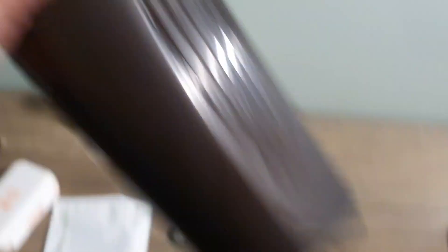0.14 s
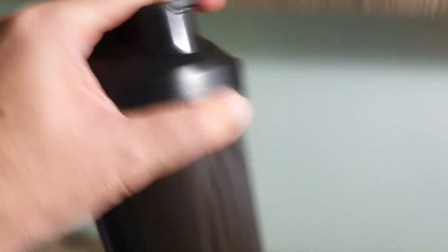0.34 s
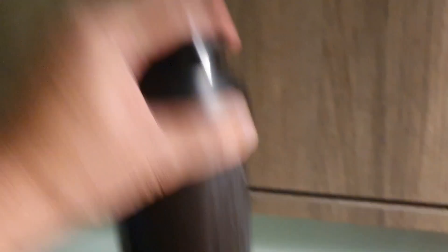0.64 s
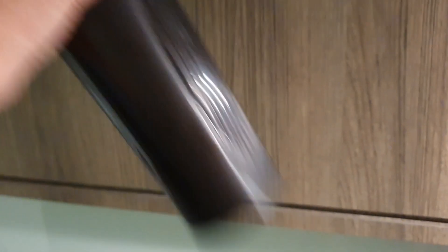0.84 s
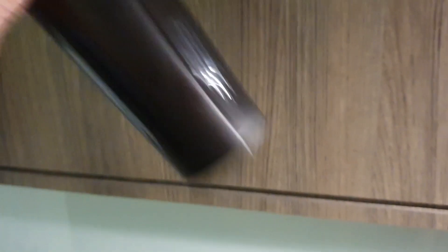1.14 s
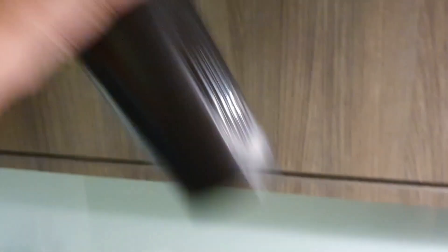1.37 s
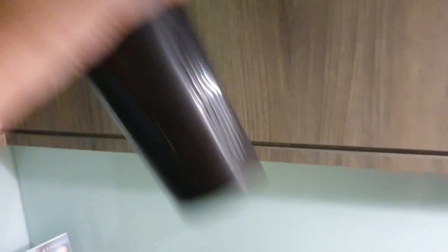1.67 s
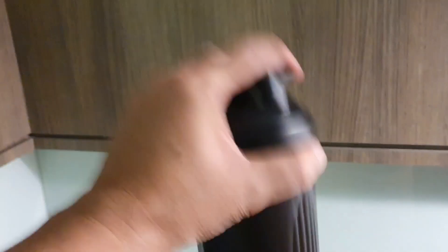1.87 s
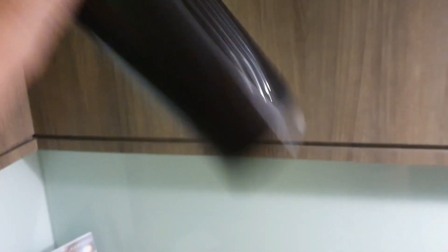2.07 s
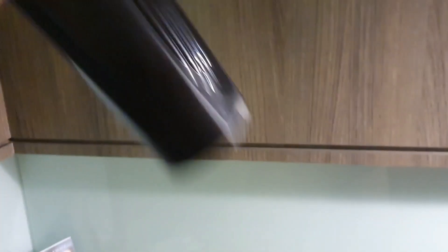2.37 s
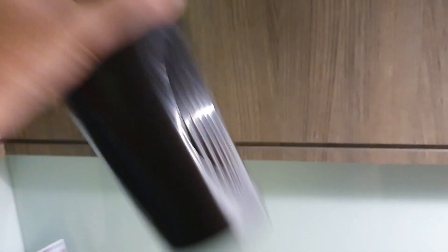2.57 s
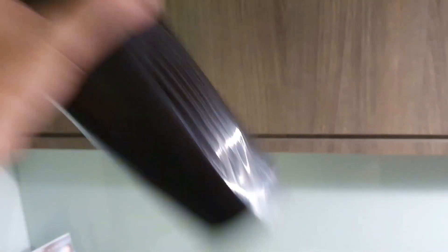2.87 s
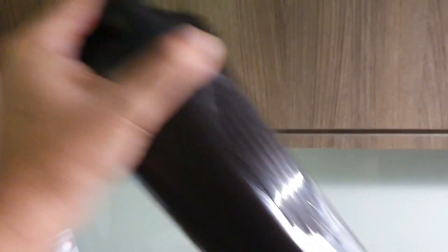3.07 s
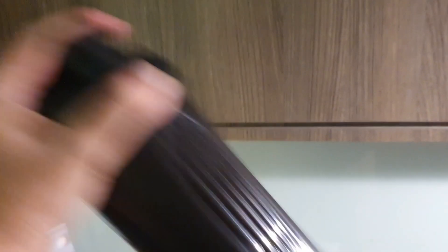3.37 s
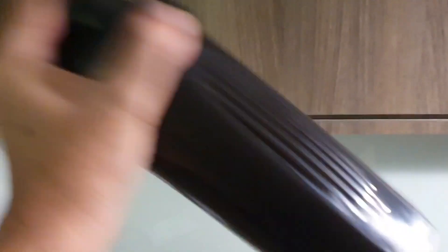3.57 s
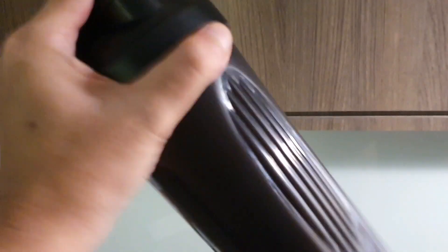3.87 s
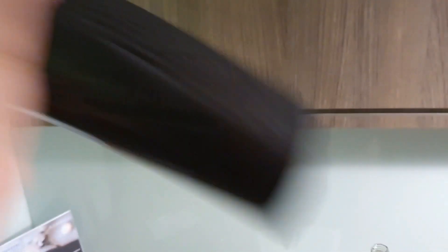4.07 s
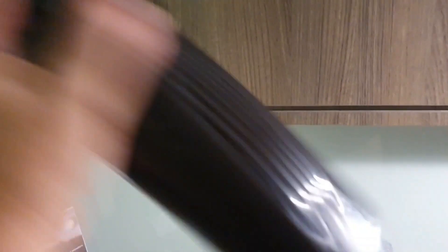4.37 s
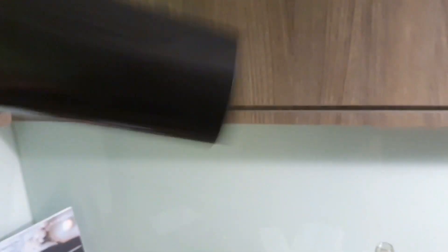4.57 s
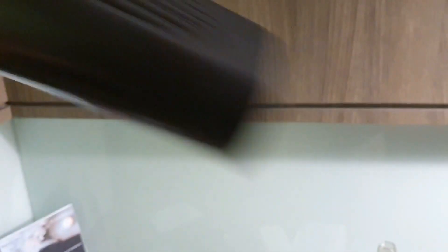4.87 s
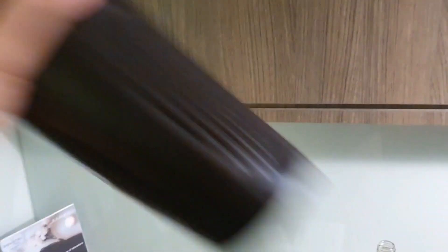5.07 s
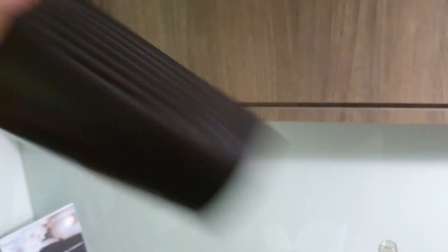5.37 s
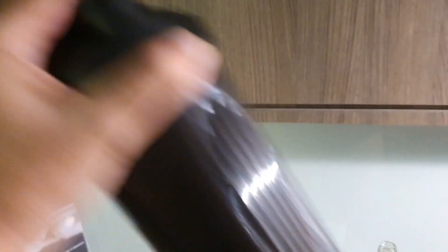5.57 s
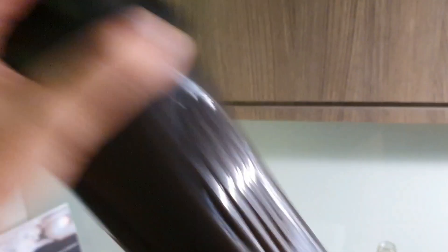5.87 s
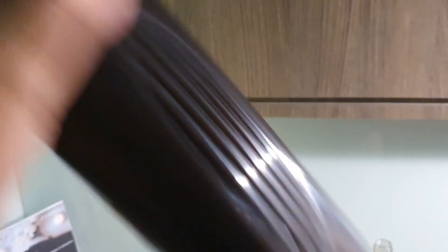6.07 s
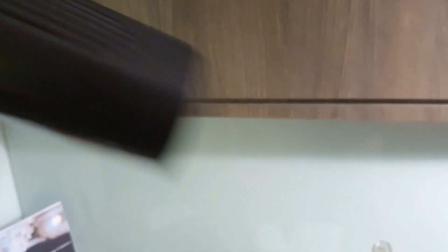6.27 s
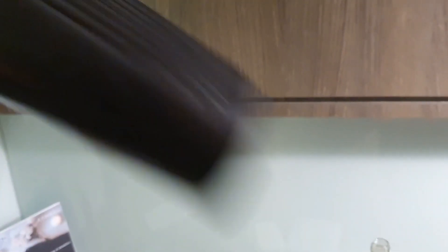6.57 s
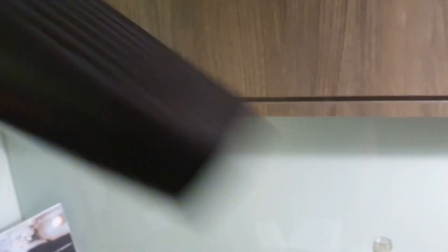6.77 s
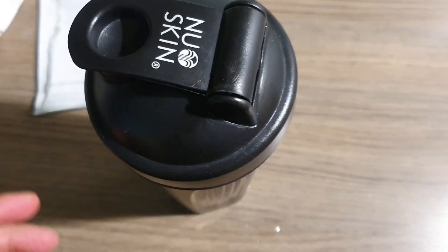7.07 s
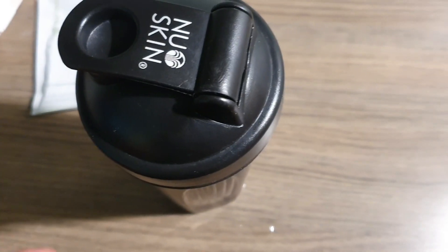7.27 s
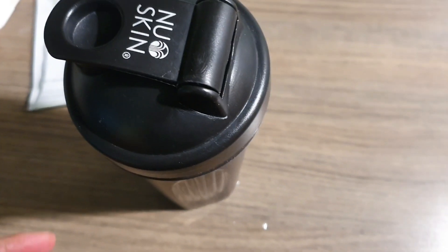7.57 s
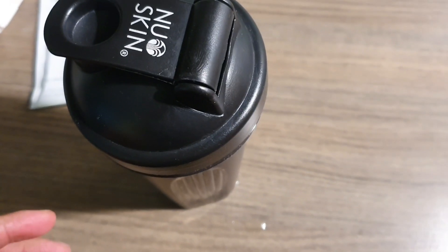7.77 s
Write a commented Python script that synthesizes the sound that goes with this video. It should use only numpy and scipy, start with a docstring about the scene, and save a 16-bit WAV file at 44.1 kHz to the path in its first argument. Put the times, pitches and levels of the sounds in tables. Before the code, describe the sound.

From 0 s the sound is already in full swing: a plastic bottle of water and powder shaken hard, very close, in a small kitchen with quick short echoes. Liquid strikes the lid about every 0.3 s and falls back on the base between, giving uneven wet bursts of bubbly spray and lower slosh, with tiny lulls in flight. Hollow knocks and bright squirts pepper it, with occasional upward-sweeping glugs, notably near 2.1 and 6.5 s. Sharp cracks cluster before 1.6 s, almost vanish until 3 s, then grow hard and fizzy from 4.1 to 6.8 s. Underneath, a faint low engine drone outside rises gradually in pitch; a second low note swells around 0.65 s and fades. At about 6.96 s bottle and drones cut off together. After a momentary dip, quiet rumble, faint hiss and hum continue to the end, with one faint bright tick near 7.46 s.

```python
"""A plastic shaker bottle of water and powder, shaken hard close by in a small kitchen: bubble clouds driven
by lid and base strokes give spray and slosh; single bubbles give gulps, squirts and glugs; clicks open cracks.
An engine outside (a gliding tone with overtones) gathers speed; a second low drone swells and fades early.
Bottle, engine and drone cut off together. Room tone (shaped noise and hum) dips briefly, then remains,
louder than under the shaking, with one faint tick."""
import sys
import numpy as np
from scipy import signal
from scipy.fft import rfft, irfft, next_fast_len
from scipy.io import wavfile
from scipy.ndimage import uniform_filter1d, map_coordinates

SR = 44100
rng = np.random.default_rng(int(sys.argv[2]) if len(sys.argv) > 2 else 0)


def wav_out(sig):
    """Save sig, one row per channel (or a flat mono array), as 16-bit PCM at SR to the path in sys.argv[1]."""
    wavfile.write(sys.argv[1], SR, np.round(np.clip(np.atleast_2d(sig).T, -1, 1) * 32767).astype(np.int16))


N = 349967
TIME_S = np.arange(N) / SR

# Liquid hits the lid: [peak t/s, spray level/dB, spray rise/s, slosh level/dB]
LID_STROKES = [(.001, -20.5, 0.0046, -26.5), (.332, -25.5, 0.034, -28.5), (.656, -24.5, 0.032, -27.5),
               (0.922, -27.5, 0.00071, -35), (1.252, -22.5, 0.018, -23), (1.528, -21, 0.017, -24),
               (1.879, -26.5, 0.048, -31.5), (2.199, -24.5, 0.032, -26), (2.497, -22.5, 0.044, -28.5),
               (2.787, -21.5, 0.065, -27.5), (3.057, -22, 0.035, -25.5), (3.321, -30, 0.017, -32),
               (3.606, -27.5, 0.0095, -26.5), (3.883, -30.5, 0.012, -49), (4.149, -24.5, 0.0093, -28),
               (4.428, -25.5, 0.016, -50), (4.721, -21.5, 0.036, -23.5), (4.967, -22.5, 0.014, -22),
               (5.279, -25.5, 0.062, -26), (5.543, -29.5, 0.019, -45), (5.824, -32, 0.052, -27.5),
               (6.115, -26.5, 0.03, -32.5), (6.378, -27, 0.023, -25.5), (6.679, -24.5, 0.029, -25.5),
               (6.925, -43, 0.0023, -24)]
# Liquid falls back on the base: [peak t/s, spray level/dB, spray rise/s, slosh level/dB]
BASE_STROKES = [(0.168, -25, 0.0018, -29.5), (.43, -26.5, 0.0013, -26), (0.763, -23.5, 0.0061, -28),
                (1.052, -29, 0.00056, -29), (1.409, -24, 0.026, -24), (1.696, -26.5, 0.031, -30.5),
                (1.958, -30, 0.00061, -28.5), (2.326, -23.5, 0.032, -26.5), (2.651, -27.5, 0.11, -28),
                (2.854, -23.5, 0.0088, -28), (3.145, -23, 0.0086, -25.5), (3.412, -26, 0.0059, -28),
                (3.693, -25.5, 0.00059, -26.5), (3.988, -31, 0.00049, -34), (4.302, -28, 0.036, -25),
                (4.605, -29.5, 0.15, -28), (4.839, -23, 0.033, -26.5), (5.12, -27.5, 0.046, -24),
                (5.356, -26.5, .0015, -24.5), (5.701, -28, 0.079, -26), (5.98, -27.5, 0.041, -26.5),
                (6.278, -23.5, 0.067, -25.5), (6.557, -27, 0.046, -24), (6.772, -27.5, 0.0043, -27)]
# Common to the strokes on each end, before shortening: (spray drain/s, fizz re spray/dB, slosh drain/s)
LID_FLOW = (0.15, 0.82, 0.11)
BASE_FLOW = (0.11, -1.3, 0.16)
# Liquid lands flat on the plastic: [t/s, spray level/dB, fizz re spray/dB]
CRACKS = [(0.095, -19.5, -2), (.329, -17, -7), (0.426, -17, -11), (0.763, -24, -3), (.916, -23, -15),
          (1.2465, -24, 9), (1.53, -24.5, 14), (1.548, -25, -4), (3.054, -28, 3), (3.407, -23.5, -2),
          (3.692, -28, 7), (3.988, -25, -16), (4.154, -12, 8), (4.713, -19, 5), (4.9846, -13.5, 7),
          (5.357, -17.5, -6), (5.5455, -16, -2), (5.776, -21.5, -16), (5.828, -18, 2), (5.923, -29, 12),
          (6.1127, -13, 5.5), (6.201, -21, 7), (6.376, -16, -1), (6.393, -20.5, 8.5), (6.677, -22, 11.5),
          (6.77, -18.5, -2)]
# Large air pockets slapped shut: [peak t/s, level before knock and smack gain/dB, f/Hz, ring time/s]
GULPS = [(.094, -15.5, 1270, 0.00098), (.171, -13.5, 700, 0.00077), (.177, -15.5, 440, 0.0023),
         (.263, -23, 1370, 0.0024), (.33, -8, 1280, 0.00062), (.438, -11, 1170, 0.00098),
         (.657, -14, 2166, 0.0026), (.657, -23, 810, 0.003), (.764, -10.5, 1130, 0.00058),
         (.787, -12, 1050, 0.0009), (.812, -16, 1060, 0.0011), (.972, -21.5, 755, 0.0017),
         (1.048, -16, 1080, 0.0011), (1.069, -13, 1260, 0.0011), (1.104, -9, 1300, 0.00037),
         (1.11, -15, 750, 0.00052), (1.268, -17, 830, 0.0028), (1.416, -11.5, 690, 0.00061),
         (1.526, -22, 800, 0.0016), (1.549, -12, 826, 0.0027), (1.603, -17, 1160, 0.0014),
         (1.649, -18.5, 1390, 0.0022), (1.711, -19, 1050, 0.0025), (1.954, -14.5, 1050, .0013),
         (2.185, -20, 1300, .0007), (2.209, -17.5, 753, 0.0026), (2.274, -18.5, 956, 0.0022),
         (2.305, -15, 1100, 0.00052), (2.323, -17, 1110, 0.0024), (2.855, -9.5, 1090, 0.00043),
         (2.86, -6.5, 1030, 0.00065), (3.054, -9.5, 2230, 0.00097), (3.055, -13.5, 740, 0.0011),
         (3.41, -14, 960, 0.00079), (3.575, -13.5, 730, 0.0008), (3.694, -9.5, 1175, 0.0015),
         (3.881, -17.5, 1124, 0.00098), (3.99, -12.5, 1200, 0.00027), (4.022, -23.5, 580, 0.0015),
         (4.229, -10, 955, 0.0011), (4.723, -13, 620, 0.001), (4.776, -8.5, 1450, 0.00051),
         (4.843, -6.5, 1030, 0.00043), (5.111, -8, 880, 0.00071), (5.14, -5.5, 740, .00072),
         (5.246, -13.5, 868, 0.001), (5.359, -10.5, 1010, 0.00078), (5.376, -16, 1130, 0.00039),
         (5.546, -4.5, 2530, 0.00071), (5.646, -13.5, 1096, 0.00093), (5.699, -8.5, 913, 0.00098),
         (5.899, -19, 1065, 0.0015), (5.93, -15, 797, 0.00068), (5.978, -15, 798, 0.00097),
         (6.12, -20, 822, 0.0035), (6.372, -23, 1240, 0.00086), (6.527, -13, 1000, 0.0011),
         (6.55, -9.5, 891, 0.00063), (6.562, -18, 1210, 0.0011), (6.719, -17.5, 736, 0.0013),
         (6.773, -11, 3110, 0.00085), (6.78, -5.5, 1020, 0.00025), (6.925, -19.5, 585, 0.0019)]
# Jets of small bubbles of about one size: [start t/s, level/dB, f/Hz, length/s]
SQUIRTS = [(.002, -30, 2740, 0.038), (0.107, -32.5, 2790, 0.15), (0.304, -29.5, 2400, 0.016),
           (0.421, -28, 2740, .022), (0.957, -29.5, 2560, 0.02), (2.175, -26.5, 2213, 0.043),
           (2.94, -31.5, 2870, 0.032), (3.045, -26.5, 2500, 0.034), (4.442, -30.5, 2348, 0.025),
           (5.582, -27, 3460, .014), (5.819, -27, 2760, 0.017), (6.372, -24.5, 2326, .03),
           (6.494, -25, 2560, 0.015)]
# Big bubbles rising through the liquid: [start t/s, peak level/dB, starting f/Hz, ring time/s]
GLUGS = [(.278, -29, 250, 0.0066), (.338, -29, 592, 0.0054), (1.108, -25.5, 263, 0.0014),
         (1.221, -28.5, 380, 0.004), (2.112, -28, 320, 0.0028), (2.137, -21, 428, 0.0035),
         (3.879, -24.5, 180, 0.011), (5.697, -22.5, 334, 0.0023), (6.266, -24, 290, 0.0022),
         (6.546, -15.5, 298, 0.0017)]
# Spectral gain of the spray: [f/Hz, gain/dB]
SPRAY_COLOUR = [(900, -20), (1600, -10), (2100, 0), (2750, -2), (3250, -9.5), (4000, -8.5), (5200, -13.5),
                (7000, -14), (8200, -24.5), (9600, -34), (12000, -27), (15500, -35.5)]
# Spectral gain of the slosh: [f/Hz, gain/dB]
SLOSH_COLOUR = [(90, -4.5), (210, -6), (370, -2), (540, -7), (820, 3.5), (1200, 2.5), (1600, -4.5),
                (2400, -8.5)]
# Air space with the liquid at the lid, hollow: [f/Hz, gain/dB]
LID_COLOUR = [(250, -1), (420, -3), (800, 2.5), (1150, -4.5), (1700, -2), (2400, -2.5), (3000, 0.5),
              (3600, -0.5)]
# Air space with the liquid at the base, broad: [f/Hz, gain/dB]
BASE_COLOUR = [(250, -1), (520, 2.5), (850, -0.5), (1350, 2), (2300, -2.5), (3000, 3), (3600, 0)]
# Left channel's phase lead for bubbles in the bottle: [f/Hz, lead/rad]
BUBBLE_LEAD = [(200, 0.47), (780, 1.01), (1350, 3.08), (1800, 3.43), (2300, 1.34)]
# Left channel's phase lead for gulp knocks: [f/Hz, lead/rad]
GULP_LEAD = [(600, 0.48), (1000, 1.28), (1350, 1.77), (2400, 1), (3100, 2.36)]
# Gulps lean left when large, right when small: [f/Hz, left re right/dB]
GULP_LEAN = [(1000, 4.5), (2300, -5.5)]
# Kitchen reverberation: [f/Hz, T60/s]
KITCHEN_T60 = [(200, 0.17), (2500, 0.34), (12000, 0.14)]
# Engine outside: [t/s, firing f/Hz, level before gain and waver/dB]
ENGINE = [(0, 39.1, -40.5), (.7, 40.54, -40), (1.35, 41.26, -31.5), (1.85, 42, -38), (3.1, 47.9, -36),
          (3.9, 49.53, -28), (4.5, 52.7, -30.5), (4.78, 54.1, -37.5), (4.95, 52.6, -33.5),
          (5.4, 55.67, -31.5), (6.1, 57, -25), (6.95, 58.1, -30)]
# Spectral gain of the room noise: [f/Hz, gain/dB]
ROOM_COLOUR = [(25, -23), (45, -4), (85, -3.5), (150, -17), (215, -23), (310, -31.5), (375, -21.5),
               (500, -37), (590, -25), (740, -30), (880, -27.5), (1100, -35), (1550, -36.5), (2100, -33.5),
               (2500, -36), (5100, -57.5), (6000, -56.5), (7600, -57.5), (8500, -84.5), (12000, -72)]
# Steady room hum: [f/Hz, rms level before the room mix/dB]
HUM = [(82, -47), (136.5, -50), (248, -65), (364, -63.5), (581, -66), (886, -67), (1378, -71)]

STOP_S, RESUME_S, EDGE_HZ = 6.959, 6.993, 15850
SLOSH_RISE_S = 0.0074  # added to spray rise: the mass of liquid builds up more slowly
SPENT_S = 0.013  # a rise this long halves the drain time: the liquid is spent on the way in
DRAIN_SHAPE = 1.21  # above 1, the flow holds for a moment and then falls away
FIZZ_GROWTH_DB_PER_S = .5  # the drink gets foamier as it mixes
LULL_LEAD_S, LULL_WIDTH_S = 0.041, 0.035  # lull while the liquid flies toward the lid
DROP_LEAD_S, DROP_WIDTH_S, DROP_SHARE = 0.013, 0.013, 0.23  # shorter, shallower lull as it falls back
HUSH_DB, HUSH_S, HUSH_LEAD_S = -4, 0.019, 0.0048  # liquid clear of the wall just before a crack
CRACK_RISE_S, CRACK_DECAY_S, SPIT_DECAY_S = 0.001, 0.0051, 0.0048
SNAP_DB, SNAP_LAG_S = 20.5, .00025
SMALL_GULPS_PER_S, SMALL_GULP_HZ, SMALL_GULP_OCTAVES = 14, 1093, 0.9
SMALL_GULP_CYCLES, SMALL_GULP_RE_HEAVE_DB = 1.4, 1.5
SQUIRT_PER_S, SQUIRT_CYCLES, SQUIRT_OCTAVES = 500, 3.2, 0.092
SQUIRT_SPREAD_DB, SQUIRT_LEAN_DB = 4, -3.5
GLUG_RISE_PER_S = 24.8  # pitch growth, in starting pitches per second
DWELL_S = 0.0092  # liquid is most fully at one end this long after it hits
WANDER_HZ = 6  # how quickly the air space changes size
SWING_HZ = 1.15
OVERTONE_DB = -14.5  # re firing note
# Second drone: pitch and level are those at its loudest
DRONE_S, DRONE_DB, DRONE_HZ, DRONE_SAG_HZ_PER_S, DRONE_WIDTH_S = 0.646, -34.5, 78.7, 4.7, 0.37
ROOM_DB = -37.5  # noise rms before the room mix
TICK_S, TICK_DB, TICK_DECAY_S, TICK_LOW_HZ, TICK_HIGH_HZ = 7.456, -53, 0.0038, 2500, 7000


def throws():
    """Each stroke throws spray and fizz and heaves the liquid: three lists of (t/s, level/dB, rise/s, decay/s)."""
    splashes, fizzes, surges = [], [], []
    for rows, (drain_s, fizz_db, slosh_drain_s) in ((LID_STROKES, LID_FLOW), (BASE_STROKES, BASE_FLOW)):
        for s, spray_db, rise_s, slosh_db in rows:
            left = 1 / (1 + rise_s / SPENT_S)
            foam_db = FIZZ_GROWTH_DB_PER_S * (s - STOP_S / 2)
            splashes.append((s, spray_db, rise_s, drain_s * left))
            fizzes.append((s, spray_db + fizz_db + foam_db, rise_s, drain_s * left))
            surges.append((s, slosh_db, rise_s + SLOSH_RISE_S, slosh_drain_s * left))
    return splashes, fizzes, surges


def strokes(rows, rest_db, lull_db, lift_db):
    """Flow level: throws build, peak and drain over churning that lulls, and lifts off the wall, in flight."""
    t = TIME_S[::16]
    flying = sum(np.exp(-((s - LULL_LEAD_S - t) / LULL_WIDTH_S) ** 2) for s, *_ in LID_STROKES)
    dropping = sum(np.exp(-((s - DROP_LEAD_S - t) / DROP_WIDTH_S) ** 2) for s, *_ in BASE_STROKES)
    flying += DROP_SHARE * dropping
    power = amp(rest_db + lull_db * flying) ** 2
    lifted = amp(lift_db * flying)
    for s, db, rise_s, decay_s in rows:
        drained = (np.maximum(t - s, 0) / decay_s) ** DRAIN_SHAPE
        fall = np.maximum((s - t) / rise_s, drained)
        power = power + (amp(db) * np.exp(-fall) * np.where(t > s, lifted, 1)) ** 2
    hush = amp(HUSH_DB * around_cracks(t + HUSH_LEAD_S, HUSH_S, CRACK_RISE_S))
    return np.interp(TIME_S, t, np.sqrt(power) * hush)


def around_cracks(t, before_s, after_s):
    """1 at each crack, falling away exponentially on either side."""
    return sum(np.exp(-abs((t - s) / np.where(t < s, before_s, after_s))) for s, *_ in CRACKS)


def patter(per_s, decay_s):
    """Blobs of liquid land at random: each lifts the flow at once, then drains."""
    hits = (rng.random(N) < per_s / SR) * rng.random(N)
    flow = signal.lfilter([1], [1, -np.exp(-1 / (decay_s * SR))], hits)
    return unit(flow - flow.mean())


def spray(blobs, splashes, fizzes, lump_db=2.0, smack_db=-18, smack_s=0.0025):
    """Small bubbles crackle behind the plastic; cracks add fine fizz and each gulp a wet smack."""
    coarse = froth(1082, 5435, per_s=4200, cycles=1.75, spread_db=3.5, shoal_db=3.0, depth_s=0.00052, count=70)
    fine = froth(4910, 15100, per_s=4000, cycles=1.83, spread_db=2.0, shoal_db=3.0, depth_s=0.000448, count=50)
    cloud = churned(coarse + fine * amp(-4.0), SPRAY_COLOUR, lump_db * blobs, octaves=.06) + snaps()
    body = lowpass(cloud, hz=4750)
    fizz = cloud - body
    smacks = [(s, db + smack_db, ring_s, smack_s) for s, db, hz, ring_s in GULPS]
    cracks = [(s, db, CRACK_RISE_S, CRACK_DECAY_S) for s, db, fizz_db in CRACKS]
    spits = [(s, db + fizz_db, CRACK_RISE_S, SPIT_DECAY_S) for s, db, fizz_db in CRACKS]
    flow = strokes(splashes + cracks + smacks, rest_db=-33.5, lull_db=-21, lift_db=-1.5)
    fizzing = strokes(fizzes + spits + smacks, rest_db=-39.5, lull_db=-20, lift_db=-3.5)
    return body * flow * amp([[-1.6], [.7]]) + fizz * fizzing * amp([[0.7], [-.7]])


def snaps():
    """The first instant of each crack is one sharp click, reaching the left channel first."""
    clicks = np.zeros((2, N))
    for s, *_ in CRACKS:
        clicks[0, round(s * SR)] = 1
        clicks[1, round((s + SNAP_LAG_S) * SR)] = 1
    return amp(SNAP_DB) * colour(clicks, SPRAY_COLOUR)


def slosh(blobs, heave, lump_db=4.5):
    """Large bubbles tumble in the heaving liquid."""
    cloud = froth(172.0, 2133, per_s=1700, cycles=1.0, spread_db=3.5, shoal_db=2.0, depth_s=0.000098, count=60)
    return churned(cloud, SLOSH_COLOUR, lump_db * blobs, octaves=.2) * heave * amp([[-.4], [-.9]])


def gulps(heave, glide=0.0067, scatter_db=5, knock_db=-1.8):
    """Large air pockets knock hollow and short; lesser ones close at random, as loud as the heave."""
    out = np.zeros((2, N))
    for s, db, hz, ring_s in GULPS:
        knock = bubble(hz, ring_s, glide, read(GULP_LEAN, hz), lead=GULP_LEAD)
        add(out, s - ring_s, amp(db + knock_db) * knock)
    for when, size, place in rng.random((int(SMALL_GULPS_PER_S * STOP_S), 3)):
        s = when * STOP_S
        hz = SMALL_GULP_HZ * 2 ** (SMALL_GULP_OCTAVES * (2 * size - 1))
        pan_db = read(GULP_LEAN, hz) + scatter_db * (2 * place - 1)
        knock = bubble(hz, SMALL_GULP_CYCLES / hz, glide, pan_db)
        add(out, s, amp(SMALL_GULP_RE_HEAVE_DB) * heave[int(s * SR)] * knock)
    return out


def squirts(glide=0.011):
    """Each jet is a quick run of bright bubble chirps scattered around one pitch."""
    out = np.zeros((2, N))
    for s, db, hz, length_s in SQUIRTS:
        jet = np.zeros((2, SR // 4))
        number = max(int(SQUIRT_PER_S * length_s), 2)
        for k, (size, strength, delay) in enumerate(rng.standard_normal((100, 3))[:number]):
            pitch_hz = hz * 2 ** (SQUIRT_OCTAVES * size)
            chirp = bubble(pitch_hz, SQUIRT_CYCLES / pitch_hz, glide, SQUIRT_LEAN_DB)
            add(jet, length_s * (k + delay % 1) / number, amp(SQUIRT_SPREAD_DB * strength) * chirp)
        jet_rms = np.sqrt(np.sum(jet ** 2) / (2 * length_s * SR))
        add(out, s, amp(db) * jet / jet_rms)
    return out


def glugs():
    """A big bubble rising through the liquid sweeps upward in one clear note."""
    out = np.zeros((2, N))
    for s, db, hz, ring_s in GLUGS:
        add(out, s, amp(db) * bubble(hz, ring_s, GLUG_RISE_PER_S * ring_s, 0))
    return out


def bubble(hz, ring_s, glide, pan_db, offset_s=0, lead=BUBBLE_LEAD):
    """An air pocket swells, rings and rises in pitch; its place in the bottle delays one channel."""
    lag_s = read(lead, hz) / (2 * np.pi * hz) + offset_s
    t = np.arange(int((10 * ring_s + abs(lag_s)) * SR)) / SR
    delays_s = np.array([[max(-lag_s, 0)], [max(lag_s, 0)]])
    age = np.maximum(t - delays_s, 0) / ring_s  # in ring times
    turns = hz * ring_s * (age + glide * age ** 2 / 2)
    return age * np.exp(1 - age) * np.sin(2 * np.pi * turns) * amp([[pan_db / 2], [-pan_db / 2]])


def froth(low_hz, high_hz, per_s, cycles, spread_db, shoal_db, depth_s, count):
    """A cloud of bubbles, most faint and a few loud; those of like size swell together in shoals."""
    out = np.zeros((2, N))
    knots = np.arange(0, N, SR // 45)
    shoals = unit(uniform_filter1d(rng.standard_normal((count, len(knots))), size=6, axis=0))
    for hz, shoal in zip(np.geomspace(low_hz, high_hz, count), shoals):
        ring_s = cycles * 2 ** rng.uniform(-1.02, 1) / hz
        shape = bubble(hz, ring_s, 0.017, rng.normal(0, 5.4), depth_s * rng.uniform(-1.032, 1))
        shape *= np.sqrt(hz / np.sum(shape ** 2))
        at = rng.integers(0, N, int(per_s / count * N / SR))
        size_db = spread_db * np.minimum(rng.exponential(1, len(at)), 4) + shoal_db * np.interp(at, knots, shoal)
        size = unit(amp(size_db)) * rng.choice([-1, 1], len(at))
        where = (at[:, None] + np.arange(shape.shape[1])).ravel()
        for side, wave in zip(out, shape):
            side += np.bincount(where, np.outer(size, wave).ravel(), N)[:N]
    return out


def churned(x, points, lumps_db, octaves):
    """Colours a bubble cloud, evens out its flow, then bunches it into quick clumps."""
    x = wander(colour(x, points), octaves)
    x = x / np.sqrt(uniform_filter1d((x ** 2).mean(0), size=800) + 1e-12)
    clumps = amp(lumps_db)
    return x * clumps / np.sqrt(uniform_filter1d(clumps ** 2, size=2200))


def wander(x, octaves):
    """The air space changes size, so its resonances slide: playback speed drifts at random."""
    speed = 2 ** (octaves * drift(hz=WANDER_HZ))
    place = np.cumsum(speed / speed.mean())
    return np.array([map_coordinates(side, [place], order=3, mode="mirror") for side in x])


def air_space(x):
    """The bottle's colour swings back and forth as the liquid goes from end to end."""
    ends = [(row[0], 1) for row in LID_STROKES] + [(row[0], 0) for row in BASE_STROKES]
    s, end = np.transpose(sorted(ends))
    at_lid = np.sin(np.pi / 2 * np.interp(TIME_S - DWELL_S, s, end)) ** 2
    return at_lid * colour(x, LID_COLOUR) + (1 - at_lid) * colour(x, BASE_COLOUR)


def swung(x, near_db, tail_db, near_s):
    """The bottle swings through three places, each with echoes of its own."""
    swing = 2 * np.pi * SWING_HZ * TIME_S
    shares = [np.cos(swing + np.pi * k / 3) * np.sqrt(2 / 3) for k in range(3)]
    return x + sum(kitchen(x * share, near_db, tail_db, near_s) for share in shares)


def kitchen(x, near_db, tail_db, near_s):
    """Cupboard and counter throw back quick echoes, with a short tail decaying by frequency."""
    t = np.arange(SR // 3) / SR
    signs = rng.choice([-1., 1.], (2, len(t)))
    taps = signs * (rng.random((2, len(t))) < .06) * (t > .002)
    hz, when, z = signal.stft(taps, SR, nperseg=256)
    decay = amp(-60 * when / read(KITCHEN_T60, hz)[:, None])
    tail = signal.istft(z * decay, SR, nperseg=256)[1][:, :len(t)]
    near = taps * np.exp(-t / near_s)
    echo = (amp(near_db) * unit(near) + amp(tail_db) * unit(tail)) / np.sqrt(len(t))
    return signal.oaconvolve(x, echo, axes=1)[:, :N]


def engine(gain_db=1.8, waver_db=1.0):
    """A low drone through the walls, climbing with engine speed, with weak overtones."""
    s, hz, db = np.transpose(ENGINE)
    phase = 2 * np.pi * np.cumsum(np.interp(TIME_S, s, hz)) / SR
    overtones = np.sin(3 * phase / 2) + np.sin(2 * phase) / 2
    level_db = np.interp(TIME_S, s, db) + gain_db + waver_db * drift(hz=8.7)
    return amp(level_db) * (np.sin(phase) + amp(OVERTONE_DB) * overtones)


def second_drone():
    """A second low note swells and fades early on, sinking in pitch."""
    age_s = TIME_S - DRONE_S
    turns = DRONE_HZ * age_s - DRONE_SAG_HZ_PER_S * age_s ** 2 / 2
    return amp(DRONE_DB) / (1 + (age_s / DRONE_WIDTH_S) ** 2) * np.sin(2 * np.pi * turns)


def room_tone(waver_rad=1.07, aimed_db=-1, lean_db=3, lag_s=.00042):
    """Rumble, alike on both sides, under faint airy hiss, partly from one side, and a wavering hum."""
    shared, aimed, *own = rng.standard_normal((4, N))
    ports = np.array([aimed * amp(-lean_db), np.interp(TIME_S - lag_s, TIME_S, aimed)])
    hiss = unit(np.array(own) + amp(aimed_db) * ports)
    apart = hiss - lowpass(hiss, hz=290)
    air = amp(ROOM_DB) * unit(colour(lowpass(shared, hz=387) + apart, ROOM_COLOUR))
    hum = sum(amp(db) * np.sin(2 * np.pi * hz * TIME_S + waver_rad * drift(hz=2.06)) for hz, db in HUM)
    return air + np.sqrt(2) * hum


def tick():
    """A faint, bright tick: a decaying burst of band-limited noise."""
    age_s = TIME_S - TICK_S
    noise = lowpass(rng.standard_normal((2, N)), TICK_HIGH_HZ)
    band = noise - lowpass(noise, TICK_LOW_HZ)
    return amp(TICK_DB) * band * (age_s > 0) * np.exp(-abs(age_s / TICK_DECAY_S))


def amp(db):
    """Decibels to gain."""
    return 10 ** (np.asarray(db) / 20)


def unit(x):
    """Scales to an rms of 1."""
    return x / np.sqrt(np.mean(x ** 2) + 1e-20)


def read(points, hz):
    """Reads a table on a log-frequency axis."""
    f, value = np.transpose(points)
    return np.interp(np.log(hz + 1), np.log(f + 1), value)


def colour(x, points):
    """Applies a table of spectral gains."""
    size = next_fast_len(N + SR // 4, real=True)
    gain = amp(read(points, np.fft.rfftfreq(size, 1 / SR)))
    return irfft(rfft(x, size) * gain, size)[..., :N]


def lowpass(x, hz):
    """Gentle low-pass without delay."""
    size = next_fast_len(N + SR // 4, real=True)
    loss = 1 + (np.fft.rfftfreq(size, 1 / SR) / hz) ** 4
    return irfft(rfft(x, size) / loss, size)[..., :N]


def drift(hz):
    """Slow random signal with an rms of 1."""
    return unit(lowpass(rng.standard_normal(N), hz))


def add(mix, s, sound):
    """Mixes a stereo sound in at time s."""
    part = mix[:, max(round(s * SR), 0):][:, :sound.shape[1]]
    part += sound[:, :part.shape[1]]


def scene():
    """The shaking with engine and drone, a brief dip, then the room alone."""
    blobs = patter(per_s=60, decay_s=0.017) * (1 - around_cracks(TIME_S, CRACK_RISE_S, after_s=0.022))
    splashes, fizzes, surges = throws()
    heave = strokes(surges, rest_db=-38.5, lull_db=-20, lift_db=0.0)
    liquid = air_space(spray(blobs, splashes, fizzes) + slosh(blobs, heave))
    bottle = swung(liquid, near_db=-7.5, tail_db=-12.5, near_s=0.0045)
    bottle += swung(gulps(heave), near_db=-5.0, tail_db=-10.5, near_s=0.0036)
    bottle += swung(squirts() + glugs(), near_db=-23.0, tail_db=-15.5, near_s=0.0027)
    shaking = uniform_filter1d(1. * (TIME_S < STOP_S), size=120)
    after = uniform_filter1d(1. * (TIME_S > RESUME_S), size=120)
    ports = amp([[-.5], [.5]])
    drones = (engine() + second_drone()) * ports
    room_gain = shaking * amp(-6) + after + amp(-19.5)
    return (bottle + drones) * shaking + room_tone() * ports * room_gain + tick()


def record(dry):
    """Steep linear-phase low-pass at the upper band edge."""
    band_limit = signal.firwin(511, EDGE_HZ, window=("kaiser", 9), fs=SR)
    return signal.oaconvolve(dry, band_limit[None], "same")


dry = scene()
out = record(dry)
wav_out(out)
```